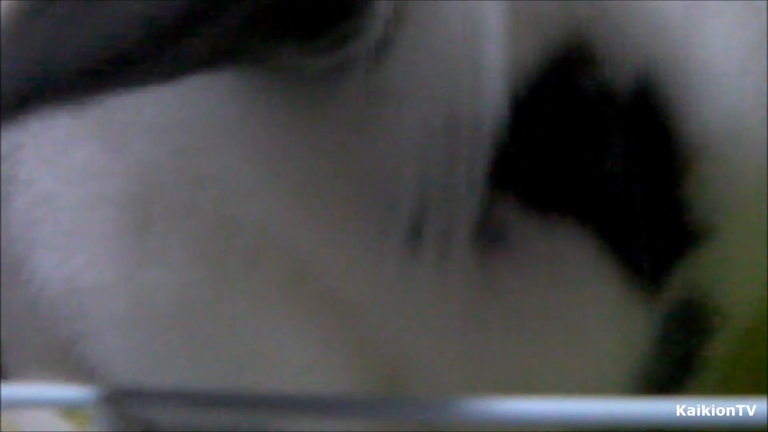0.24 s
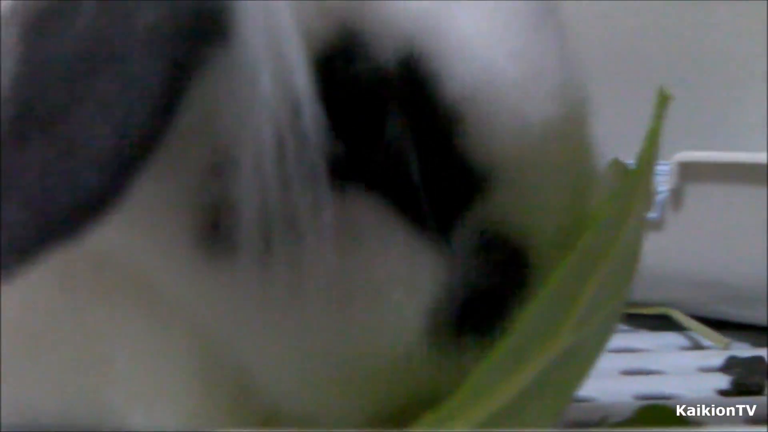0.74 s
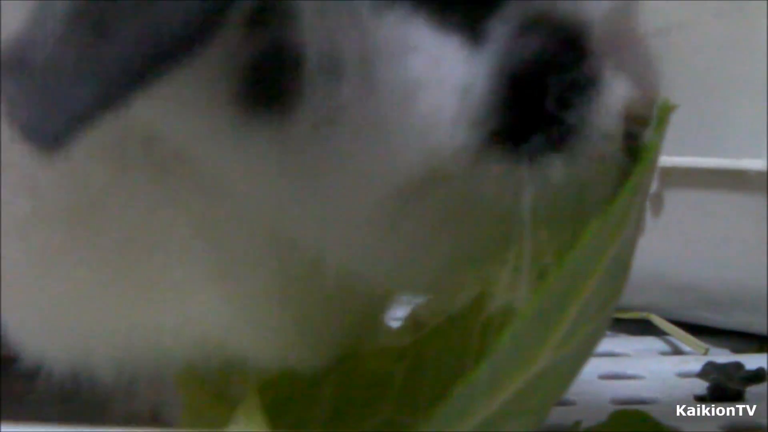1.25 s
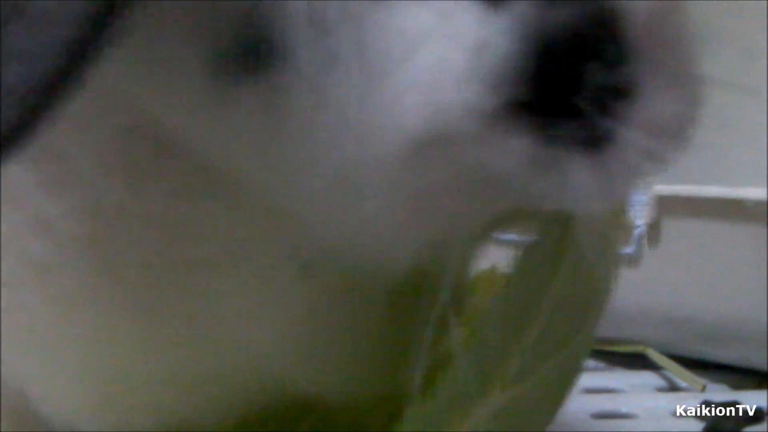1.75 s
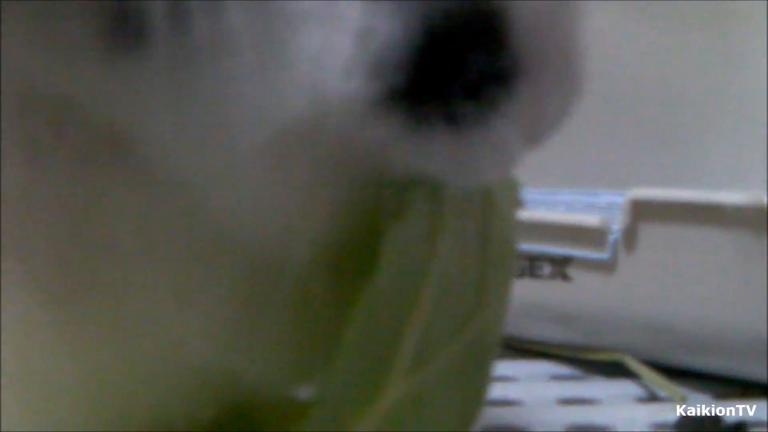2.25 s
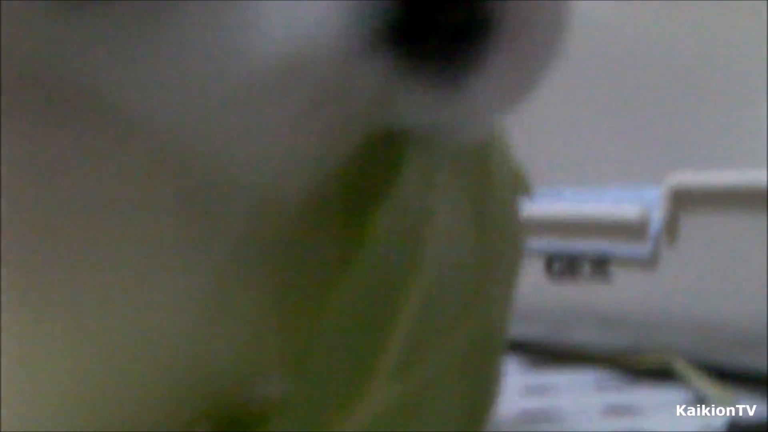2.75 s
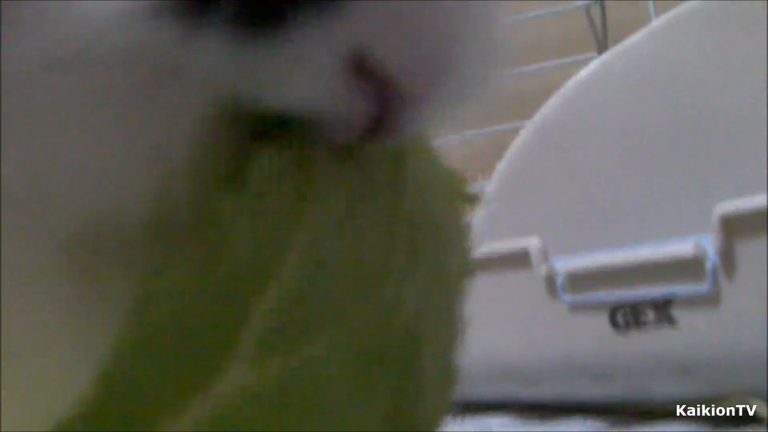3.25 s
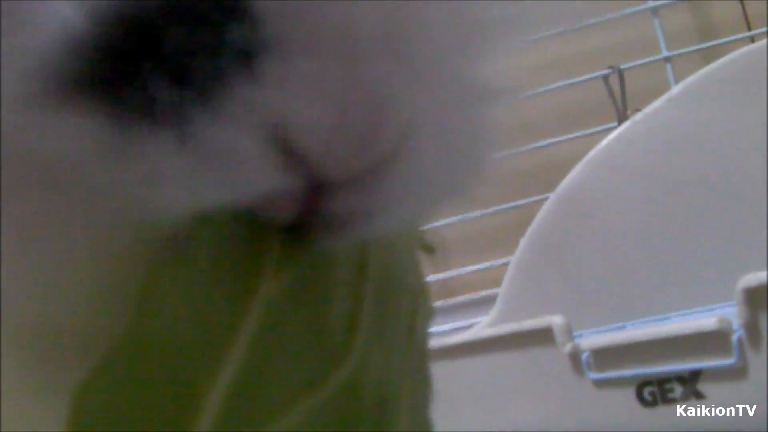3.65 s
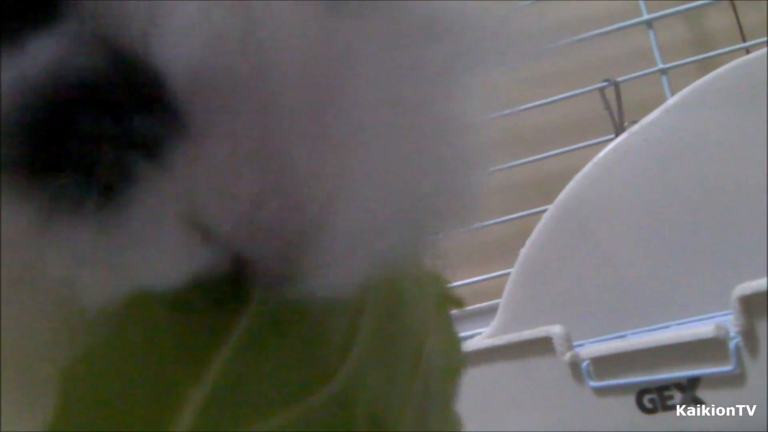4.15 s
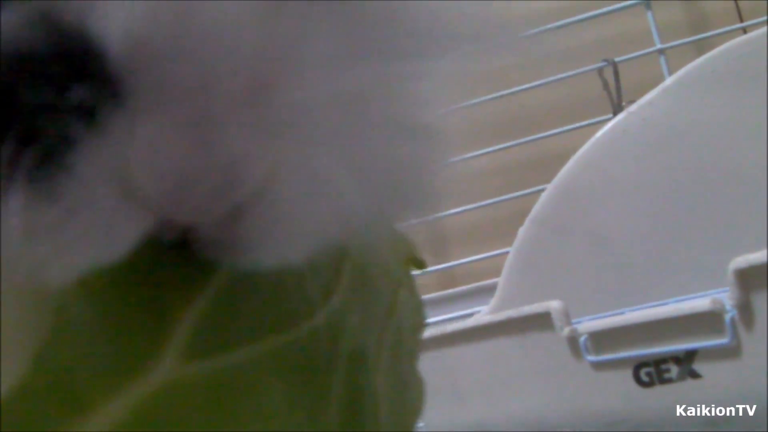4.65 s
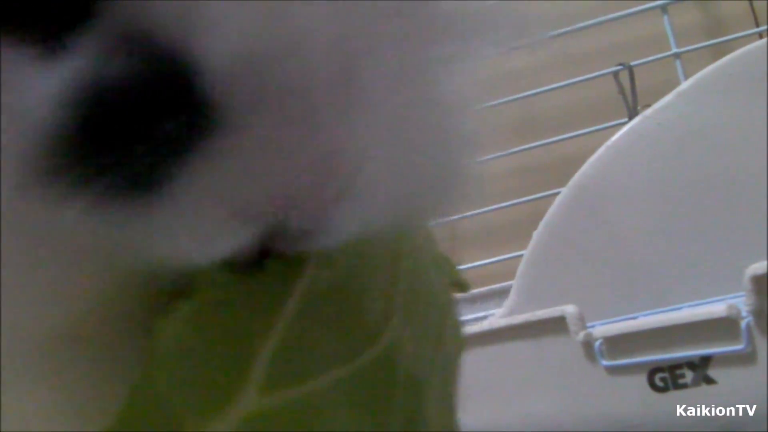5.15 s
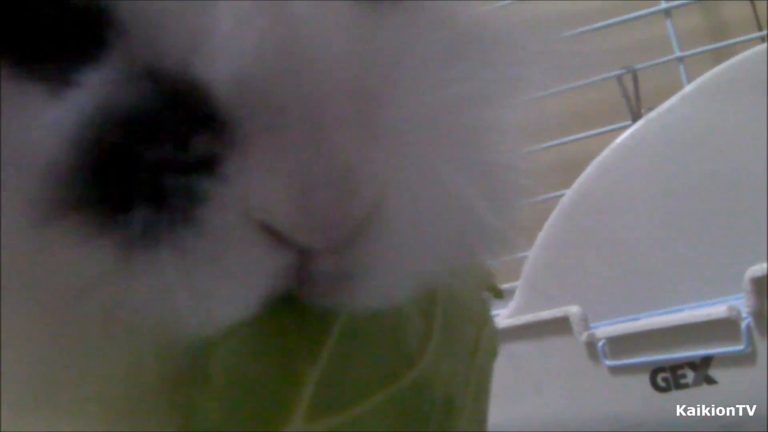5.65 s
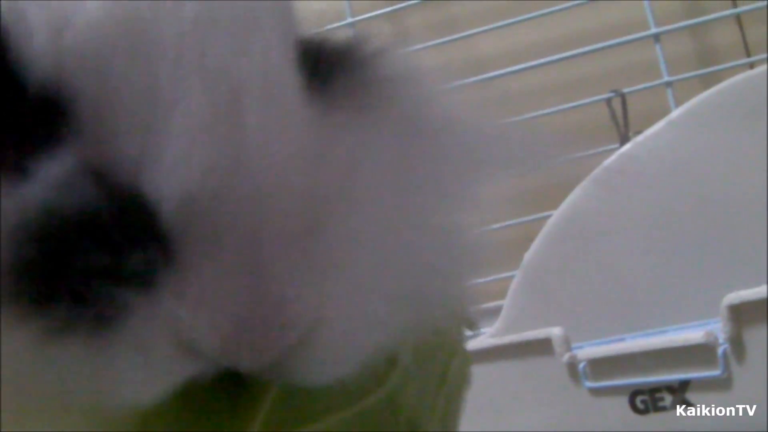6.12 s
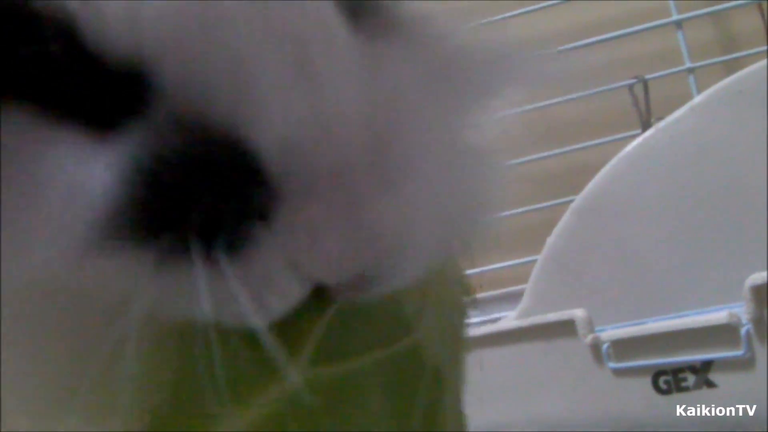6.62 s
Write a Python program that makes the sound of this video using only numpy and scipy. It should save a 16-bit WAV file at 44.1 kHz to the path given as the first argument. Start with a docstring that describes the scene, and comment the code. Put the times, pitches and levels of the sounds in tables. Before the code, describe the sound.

A quiet indoor room hums low under soft microphone hiss, with faint rubbing of fur and leaf. A light tap on plastic at 0.7 seconds precedes the first crunch at 0.85, somewhat muffled. Single bites follow at 1.3, with a brief thin leaf slide, and a strong snap at 1.55. From 1.8 to 2.8 small crackling nibbles come rapidly, with a soft wet chew near 2.6. Between 2.8 and 3.6 the leaf is tugged: rustling, duller mouthy crunches, a sliding hiss, low rumbling and small knocks, ending in the loudest hollow plastic thump at 3.57. Strong snaps burst around 3.85, then bright crisp ones near 4.5. Softer nibbling and little wet chews fill 4.7 to 5.8. Crisp bites strengthen at 6.0 and 6.3, with a sharp loud snap at 6.47 and another at 6.66. Everything is close and dry, slightly left, with a tiny cage echo.

```python
"""In a cage indoors, a rabbit eats a cabbage leaf a hand's width from a camera.
Each bite is a swell of tiny random cell bursts with a few sharp vein snaps, made of filtered noise.
Crisp bites burst more skin, dull ones sound more in the mouth; wet chews and sliding hisses come between.
Midway it tugs the leaf about and bumps the plastic floor, which rings as a set of fading sine tones.
A quiet room hums and the microphone hisses, both from shaped noise."""
import sys
import numpy as np
from scipy import signal
from scipy.fft import rfft, irfft, next_fast_len
from scipy.io import wavfile
from scipy.ndimage import uniform_filter1d, map_coordinates

SR = 44100
rng = np.random.default_rng(int(sys.argv[2]) if len(sys.argv) > 2 else 0)


def waveform_to_disk(signal):
    """Save audio, clipped to [-1, 1], as 16-bit WAV at the path in sys.argv[1]."""
    frames = np.transpose(np.atleast_2d(signal))
    scaled = np.clip(frames, -1, 1) * 32767
    samples = np.round(scaled).astype(np.int16)
    wavfile.write(sys.argv[1], SR, samples)


N = 303408  # length of the scene [samples]

# bites, about five a second, before each voice's offset:
# (time of greatest force [s], length [s], level [dB], crispness [dB])
BITES = [(0.851, 0.08, -44, 3), (1.297, .1, -46.5, 8.5), (1.555, 0.067, -38, -0.5), (1.782, 0.17, -50, 0.5),
         (1.948, .08, -48, 3.5), (1.991, 0.1, -49, 2), (2.162, 0.082, -52, 0.5), (2.346, 0.076, -53, 1.5),
         (2.563, 0.12, -52.5, -7.5), (2.781, .09, -50.5, -1.5), (3.015, 0.087, -48, 0),
         (3.285, .15, -54.5, -11), (3.341, 0.068, -49.5, -2.5), (3.419, 0.1, -47.5, -0.5),
         (3.467, .14, -50.5, -3), (3.582, .045, -44, -4.5), (3.656, .12, -46.5, 0), (3.832, 0.11, -47.5, 0),
         (3.865, .085, -41, 1.5), (4.058, 0.18, -50, 0.5), (4.432, 0.047, -48, 5), (4.486, .11, -42, 3.5),
         (4.665, 0.044, -52, 1), (4.707, 0.067, -50, 3.5), (4.923, 0.092, -58.5, 4), (5.123, 0.084, -48, 3),
         (5.294, 0.047, -51.5, 5), (5.538, 0.14, -54, 0.5), (5.712, .09, -52.5, 5.5),
         (5.983, 0.15, -46.5, 3), (6.217, 0.12, -48.5, 3.5), (6.269, 0.085, -45, 5),
         (6.451, 0.038, -44.5, 7), (6.472, 0.07, -43.5, 4), (6.667, 0.062, -44.5, 4.5)]
# thick veins snapping, before each voice's offset:
# (time [s], energy packed into one millisecond [dB], crispness [dB])
THICK_VEINS = [(.8438, -31, 1.5), (1.5502, -28.5, 3), (1.7876, -34.5, 2), (1.944, -36.5, 3),
               (1.9871, -42.5, -2), (2.158, -39, -2), (2.338, -49, 5), (2.3602, -50, 0), (2.572, -39, -4),
               (2.885, -42, 1), (2.991, -37.5, -3.5), (3.026, -38, -9), (3.0916, -47.5, -16.5),
               (3.1812, -40, -0.5), (3.229, -35.5, -5.5), (3.2763, -44.5, -16.5), (3.3187, -43.5, -12.5),
               (3.4113, -35, 4.5), (3.4644, -37.5, -2), (3.5704, -35.5, -7), (3.6511, -38, 5),
               (3.6745, -31.5, -0.5), (3.829, -31.5, 1.5), (3.8544, -27.5, 1.5), (3.872, -30, -1.5),
               (4.0613, -34.5, 1), (4.0735, -33.5, 1), (4.1122, -37.5, 0.5), (4.1716, -39.5, 4.5),
               (4.2428, -45.5, 5), (4.3806, -45, 0), (4.4263, -50.5, 16.5), (4.4903, -30.5, 12),
               (4.495, -30, 16.5), (4.548, -48.5, -5), (4.6984, -34, 5), (4.9051, -47, 13.5),
               (4.9224, -40, -2.5), (5.1127, -41, 8), (5.1338, -38.5, 0.5), (5.24, -45.5, 3.5),
               (5.4305, -54.5, 13.5), (5.7016, -48.5, 17.5), (5.7164, -42.5, 9), (5.937, -41.5, -2.5),
               (5.9889, -30.5, 10.5), (6.0062, -32.5, 3), (6.278, -31.5, 15), (6.291, -41, 6),
               (6.4483, -42, 12.5), (6.4687, -23.5, 3.5), (6.4977, -38.5, -1), (6.6606, -28, 4.5),
               (6.734, -49, 8)]
# at first the muzzle is turned away and hides all but the leaf's fibres: (time [s], level [dB])
HIDDEN_BY_MUZZLE = [(.85, -11.5), (1.55, -9), (1.75, 0)]
# tone of the leaf's three voices, only the shape counts: (frequency [Hz], level per Hz [dB])
CRISP_TONE = [(4400, -30.5), (7000, -0.5), (8500, 5), (11300, 6), (13000, 4), (15500, -1), (17000, -18)]  # bursting skin cells
FIBRE_TONE = [(1300, -16.5), (2300, -3), (3000, -2), (4100, 1.5), (5500, 0.5), (7000, -2), (9500, -21)]  # tearing fibres
MOUTH_TONE = [(100, -6.5), (250, -6.5), (400, 1.5), (550, -2.5), (800, 0.5), (1150, 2.5), (1500, -4.5),
              (2100, -3), (3200, -23)]  # pulp crushed in the mouth
# leaf and fur rubbing between bites, most while the leaf is tugged about: (time [s], level [dB])
RUBBING = [(0, -60.5), (.29, -61), (.36, -66.5), (.55, -60), (.78, -67.5), (1, -62), (1.18, -67),
           (1.4, -59), (1.68, -63), (2.65, -61.5), (2.88, -54.5), (3.55, -57), (3.75, -66), (4.1, -61),
           (5, -64.5), (5.4, -62.5), (6.12, -77), (6.6, -63)]
# rubbing added to each voice, one value each: (mouth [dB], fibre [dB], crisp [dB])
RUBBING_VOICES_DB = [-1.5, -2, -2]
# where the mouth is, before each voice takes its share: (time [s], left minus right [dB])
MOUTH_SIDE = [(0, -3), (2.5, -2.5), (4.1, -3.5), (4.5, -4.5), (5.2, -4), (6.3, -3.5), (6.9, -2)]
# soft wet chews: (time [s], length [s], level [dB])
WET_CHEWS = [(2.572, 0.07, -48.5), (5.324, 0.066, -52.5), (5.537, 0.051, -50), (5.752, 0.087, -53),
             (6.469, 0.029, -48)]
# tone of the hollow mouth, only the shape counts: (frequency [Hz], level per Hz [dB])
MOUTH_HOLLOW = [(450, -23), (750, -1.5), (1080, 0.5), (1350, -8), (2200, -20.5)]
# leaf sliding past the muzzle, rise and fall each span 20 dB:
# (time of the peak [s], rise [s], fall [s], level [dB], centre frequency [Hz])
LEAF_SLIDES = [(1.315, 0.018, 0.15, -51, 5960), (3.49, 0.17, 0.32, -52, 3620)]
# tones of the plastic floor: (frequency [Hz], average level in the ring [dB], time to fade by 60 dB [s])
FLOOR_TONES = [(108, -18, .26), (159, -9.5, .16), (215, -9, .06), (305, -5, .045), (355, -3.5, .052),
               (402, 0, .07), (462, -6, .05)]
# bumps on the floor: (time [s], level [dB])
FLOOR_BUMPS = [(.701, -55), (2.196, -46.5), (3.018, -47), (3.15, -39.5), (3.237, -41), (3.569, -25.5),
               (4.698, -46.5), (4.923, -48.5), (5.735, -49.5)]
# the body shifting its weight on the floor: (time [s], level before a random wobble [dB])
WEIGHT_SHIFTS = [(0, -90), (.6, -73), (.7, -59.5), (.85, -72.5), (2.4, -67), (2.8, -58), (3.2, -58.5),
                 (3.45, -58), (3.65, -51.5), (3.8, -65), (4.3, -70), (6.9, -75)]
# tone of that shifting, only the shape counts: (frequency [Hz], level per Hz [dB])
WEIGHT_TONE = [(30, -30), (70, -13), (150, -1), (250, -17.5), (400, -7), (700, -13.5), (1500, -48)]
# echo of the cage walls: (frequency [Hz], time to fade by 60 dB [s])
WALL_ECHO = [(200, 0.23), (1200, 0.15), (5000, 0.13), (14000, 0.033)]
# tone of the room and microphone hiss, only the shape counts: (frequency [Hz], level per Hz [dB])
ROOM_TONE = [(12, -45), (20, -41), (75, 5), (170, -2), (291, -9.5), (431, -6.5), (541, -3.5), (825, -12.5),
             (950, -9.5), (1370, -12.5), (2090, -16), (2930, -12.5), (3470, -15.5), (15000, -16.5),
             (16800, -50)]
# how alike left and right are in that noise: (frequency [Hz], likeness [1 = the same])
ROOM_LIKENESS = [(40, 1), (120, 0.78), (500, 0.2), (1200, 0.59), (3000, 0.065), (12000, 0.062)]

RISE_SHARE = 0.48  # part of a bite spent pressing down; the rest is the release
SWELL_DB = 19  # how far the crackle grows from the start of a bite to its peak
THIN_VEIN_DB = 2  # average level of a thin vein over its bite
THIN_VEIN_SCATTER = 0.2  # how far a thin vein strays from the peak, as a share of the bite's length
FIBRE_DB = -3  # the fibres, relative to the level of a bite or snap
TOP_HZ = 16200  # upper band limit


def amp(db):
    """Turn decibels into gain."""
    return 10 ** (np.asarray(db) / 20)


def unit(x):
    """Scale a sound to an average strength (rms) of 1."""
    return x / np.sqrt(np.mean(x ** 2) + 1e-20)


def along(points, hz):
    """Read (frequency, value) points between their entries, on a log frequency axis."""
    point_hz, values = np.transpose(points)
    return np.interp(np.log(hz + 1), np.log(point_hz + 1), values)


def curves(rows):
    """Spread each column after the time into one value per sample."""
    times, *columns = np.transpose(rows)
    return np.array([np.interp(np.arange(N) / SR, times, column) for column in columns])


def wobble(rate):
    """Draw a smooth random curve through `rate` random points a second."""
    points = rng.standard_normal(int(N * rate / SR) + 4)
    return map_coordinates(points, [np.arange(N) * rate / SR])


def fade(t, t60):
    """Die away by 60 dB in t60 seconds."""
    return np.exp(-np.log(1000) * t / t60)


def filtered(x, response):
    """Multiply the spectrum of a sound by a response to frequency."""
    size = next_fast_len(N + SR // 4)
    spectrum = rfft(x, size) * response(np.fft.rfftfreq(size, 1 / SR))
    return irfft(spectrum, size)[..., :N]


def coloured(x, tone, size=1024):
    """Give each row of x a tone with a filter that only looks back in time."""
    cepstrum = irfft(np.log(amp(along(tone, np.fft.rfftfreq(size, 1 / SR)))))
    # folding the second half onto the first makes the filter act as early as it can
    cepstrum[1:size // 2] *= 2
    cepstrum[size // 2 + 1:] = 0
    kernel = irfft(np.exp(rfft(cepstrum)))
    return signal.fftconvolve(x, kernel[None], axes=1)[:, :x.shape[1]]


def ports(pair, side_db):
    """Make left and right from one shared and one opposed noise, at rms 1."""
    mid = unit(pair[0])
    side = unit(pair[1]) * amp(side_db)
    return unit(np.array([mid + side, mid - side]))


def add(track, s, sound):
    """Lay a sound into a track at time s."""
    part = track[..., max(round(s * SR), 0):][..., :sound.shape[-1]]
    part += sound[..., :part.shape[-1]]


def cabbage(left_lag=1.2e-5):
    """Snaps, tearing and rubbing sound in all three voices of the leaf; left_lag is in seconds."""
    times, (mouth_db, fibre_db, crisp_db) = breaks()
    force = bite_force()
    rub = amp(curves(RUBBING) + np.array(RUBBING_VOICES_DB)[:, None])

    mouth = snapping(times, mouth_db, MOUTH_TONE, t60=0.013, shiver_db=-9, shiver_t60=0.045, side_db=-18)
    mouth += force[0] * crackling(MOUTH_TONE, rate=550, spread_db=3.5, friction_db=-3.5, side_db=-11)
    mouth_rub = crackling(MOUTH_TONE, rate=120, spread_db=3.5, friction_db=0.5, side_db=-7.5)
    mouth += rub[0] * amp(2.4 * wobble(30)) * mouth_rub

    fibre = snapping(times, fibre_db, FIBRE_TONE, t60=0.016, shiver_db=5, shiver_t60=0.013, side_db=-3.5)
    fibre += force[1] * crackling(FIBRE_TONE, rate=1400, spread_db=10, friction_db=1.5, side_db=-4)
    fibre += rub[1] * crackling(FIBRE_TONE, rate=540, spread_db=5, friction_db=7, side_db=-2.5)

    crisp = snapping(times, crisp_db, CRISP_TONE, t60=0.0021, shiver_db=-21, shiver_t60=0.038, side_db=-7)
    crisp += force[2] * crackling(CRISP_TONE, rate=1400, spread_db=5, friction_db=-3, side_db=1.5)
    crisp += rub[2] * crackling(CRISP_TONE, rate=850, spread_db=3, friction_db=3, side_db=3)

    # the higher the voice, the more the camera body shades the far microphone port
    voices = amp(-1.97) * placed(reshaped(mouth, depth_db=2.5), 0.19)
    voices += amp(-0.5) * placed(fibre, 0.35)
    voices += amp(-0.63) * placed(crisp, 1.2)
    # the sound also reaches the far (left) port a little later
    lags = np.array([[left_lag], [0]])
    return filtered(voices, lambda hz: np.exp(-2j * np.pi * hz * lags))


def bite_force():
    """Each bite builds up and lets go, which sets the loudness of the three voices."""
    t = np.arange(N) / SR
    power = np.zeros((3, N))
    for s, length, db, crispness_db in BITES:
        rise = RISE_SHARE * length
        fall = (1 - RISE_SHARE) * length
        near = slice(max(int((s - 2 * rise) * SR), 0), int((s + 2 * fall) * SR))
        swell_db = -SWELL_DB * np.maximum((s - t[near]) / rise, (t[near] - s) / fall)
        power[:, near] += amp(voice_levels(s, db, crispness_db)[:, None] + swell_db) ** 2
    return np.sqrt(power)


def breaks(count=2):
    """Thick veins snap at listed times, and `count` thin ones give way at random near each bite's peak."""
    snaps = list(THICK_VEINS)
    for s, length, db, crispness_db in BITES:
        for early_late, size, colour in rng.uniform(-1, 1, (count, 3)):
            time = s + THIN_VEIN_SCATTER * length * early_late
            snaps.append((time, db + THIN_VEIN_DB + 3 * size, crispness_db + 4 * colour))
    times, db, crispness_db = np.transpose(snaps)
    return times, voice_levels(times, db, crispness_db)


def voice_levels(s, db, crispness_db):
    """The crisper a break, the more skin bursts and the less the mouth sounds (mouth, fibre, crisp in dB)."""
    hidden_db = np.interp(s, *np.transpose(HIDDEN_BY_MUZZLE))
    return np.array([db - crispness_db + hidden_db, db + FIBRE_DB, db + crispness_db + hidden_db])


def snapping(times, levels_db, tone, t60, shiver_db, shiver_t60, side_db, size=3072):
    """Each vein breaks in an instant and the leaf shivers briefly: noise with two fading parts."""
    track = np.zeros((2, N))
    t = np.arange(size) / SR
    shape = fade(t, t60) + amp(shiver_db) * fade(t, shiver_t60)
    milliseconds = 1000 * size / SR
    hz = np.geomspace(100, SR / 2, 44)
    for s, db in zip(times, levels_db):
        # every piece of leaf has its own shape, and so its own resonances
        own_db = along(tone, hz) + rng.normal(0, 2.8, len(hz))
        burst = coloured(shape * rng.standard_normal((2, size)), np.transpose([hz, own_db]))
        # the level states the energy as if packed into one millisecond
        add(track, s, amp(db) * ports(burst, side_db) / np.sqrt(milliseconds))
    return track


def crackling(tone, rate, spread_db, friction_db, side_db):
    """Cells of very unequal size burst at random, `rate` a second, over soft friction noise; rms 1."""
    bursts = rng.random(N) < rate / SR
    sizes = amp(spread_db * np.minimum(rng.standard_normal(N), 2))
    grains = unit(bursts * sizes * rng.choice([-1, 1], (2, N)))
    friction = amp(friction_db) * rng.standard_normal((2, N))
    return ports(coloured(grains + friction, tone), side_db)


def reshaped(x, depth_db, size=512):
    """The mouth changes shape as it chews, so its resonances come and go at random."""
    z = signal.stft(x, nperseg=size)[2]
    field = rng.standard_normal(z.shape[1:])
    field = uniform_filter1d(field, size=2, axis=0)  # smooth over frequency
    field = uniform_filter1d(field, size=8, axis=1)  # smooth over time
    gains = unit(amp(depth_db * unit(field)))
    return signal.istft(z * gains, nperseg=size)[1][:, :N]


def placed(x, share):
    """Lean a voice toward the side where the mouth is, keeping the total gain power constant."""
    gains = amp(share * curves(MOUTH_SIDE) * np.array([[1], [-1]]) / 2)
    return x * gains / np.sqrt(np.mean(gains ** 2, axis=0))


def munching():
    """Soft pulp squeezed between the teeth crackles in the hollow of the mouth."""
    t = np.arange(N) / SR
    squeeze = sum(amp(db) * np.exp(-(2 * (t - s) / length) ** 2) for s, length, db in WET_CHEWS)
    return squeeze * crackling(MOUTH_HOLLOW, rate=450, spread_db=6.5, friction_db=-5, side_db=-41)


def sliding(width_hz=700):
    """The leaf slides past the muzzle with a thin hiss: a narrow band of noise that swells and fades."""
    t = np.arange(N) / SR
    track = np.zeros((2, N))
    for s, rise, fall, db, centre_hz in LEAF_SLIDES:
        noise = rng.standard_normal((2, N))
        hiss = filtered(noise, lambda hz: np.exp(-((hz - centre_hz) / width_hz) ** 2 / 2))
        drop_db = 20 * np.minimum(np.maximum((s - t) / rise, (t - s) / fall), 10)
        track += amp(db - drop_db) * ports(hiss, side_db=1.5)
    return track


def tray(attack=0.0013):
    """The plastic floor booms in fading tones when bumped and rumbles as the rabbit shifts."""
    track = np.zeros(N)
    t = np.arange(SR // 3) / SR
    for s, db in FLOOR_BUMPS:
        ring = np.zeros(len(t))
        for hz, level_db, t60 in FLOOR_TONES:
            tone = np.sin(2 * np.pi * (hz * t + rng.random()))
            ring += amp(level_db + rng.normal(0, 1)) * fade(t, t60) * tone
        add(track, s, amp(db) * ring * (1 - np.exp(-t / attack)))
    rumble = filtered(rng.standard_normal((2, N)), lambda hz: amp(along(WEIGHT_TONE, hz)))
    shifting = amp(curves(WEIGHT_SHIFTS) + 4 * wobble(26))
    return track + shifting * ports(rumble, side_db=-13.5)


def walls(x):
    """The cage walls answer with a short tail of noise, the treble dying first."""
    hz, t, z = signal.stft(rng.standard_normal((2, SR // 4)), SR, nperseg=256)
    tail = signal.istft(z * fade(t, along(WALL_ECHO, hz)[:, None]), SR, nperseg=256)[1]
    return signal.fftconvolve(x, tail / np.linalg.norm(tail[0]), axes=1)[:, :N]


def background(level_db=-59, drone_db=-70, drone_hz=407, width_hz=42):
    """Room noise and microphone hiss are one shaped noise, with a narrow band of noise as a soft drone."""
    def split(hz):
        """Share the noise between mid and side so that left and right are as alike as listed."""
        turn = np.arccos(np.clip(along(ROOM_LIKENESS, hz), -1, 1)) / 2
        return amp(along(ROOM_TONE, hz)) * [np.cos(turn), np.sin(turn)]

    mid, side = filtered(rng.standard_normal((2, N)), split)
    quiet = unit(np.array([mid + side, mid - side]))
    drone = filtered(rng.standard_normal(N), lambda hz: 1 / (1 + ((hz - drone_hz) / width_hz) ** 2))
    return amp(level_db) * quiet + amp(drone_db) * unit(drone)


def scene():
    """The rabbit sounds close up, with its cage and the room around it."""
    eating = cabbage() + munching() + sliding() + tray()
    return eating + amp(-13.5) * walls(eating) + background()


def record(dry):
    """The camera dips a narrow band in the treble and cuts steeply above its band limit."""
    def response(hz):
        notch = 1 - 0.8 / (1 + 1j * (hz - 7880) / 220)  # centre and half width in Hz
        return notch / np.sqrt(1 + (hz / TOP_HZ) ** 180)

    return filtered(dry, response)


dry = scene()
out = record(dry)
waveform_to_disk(out)
```